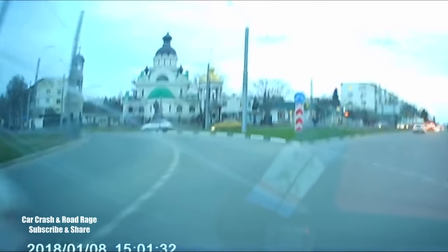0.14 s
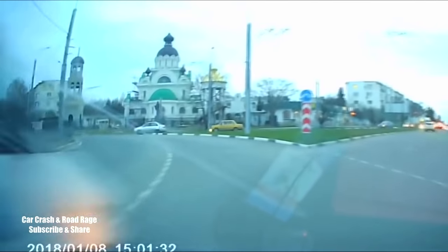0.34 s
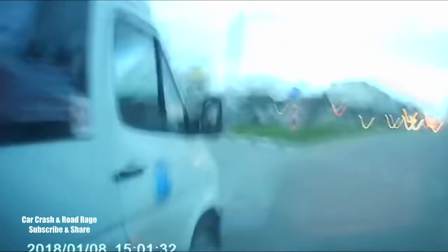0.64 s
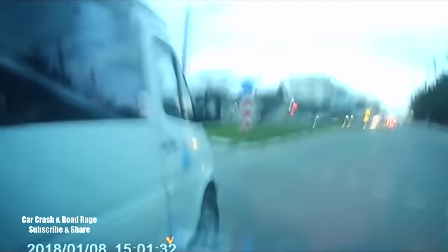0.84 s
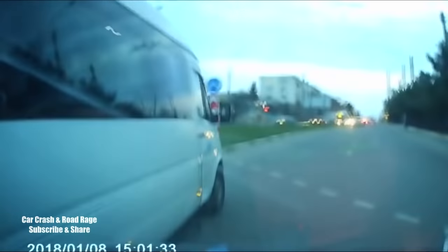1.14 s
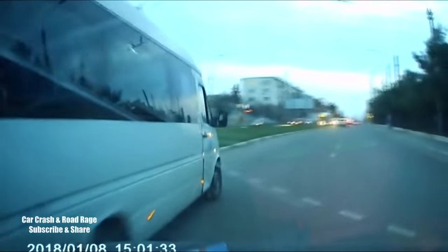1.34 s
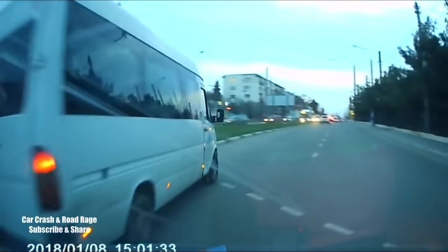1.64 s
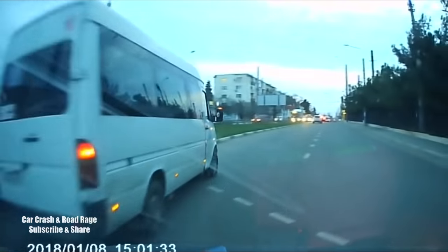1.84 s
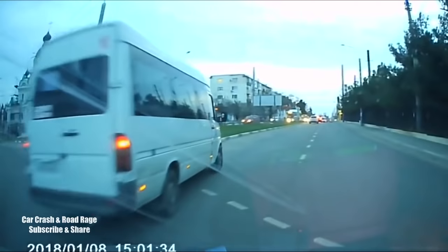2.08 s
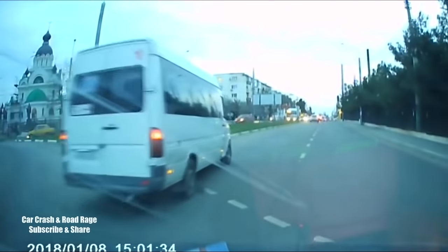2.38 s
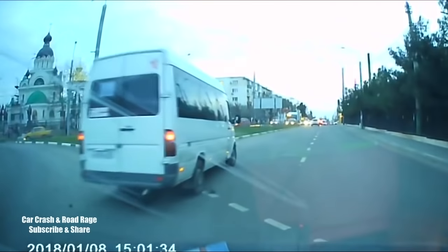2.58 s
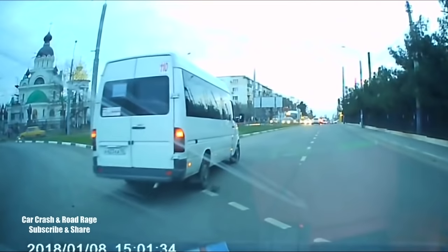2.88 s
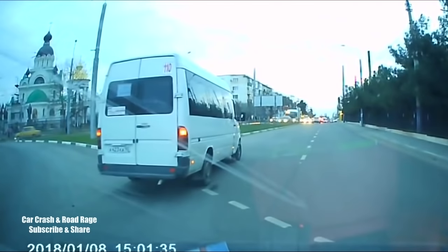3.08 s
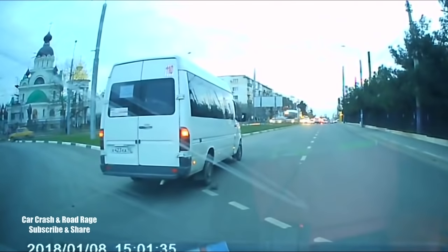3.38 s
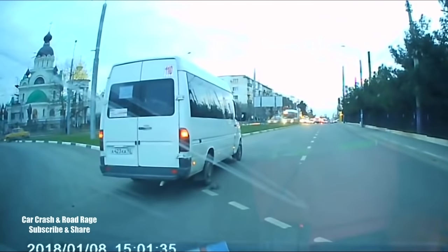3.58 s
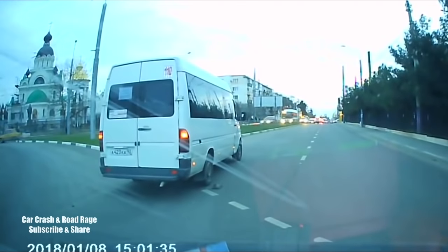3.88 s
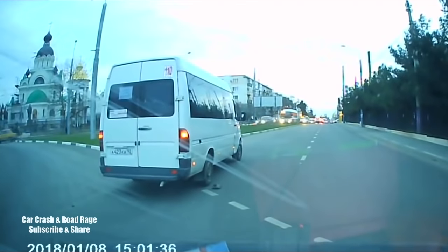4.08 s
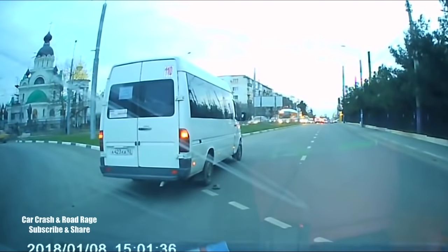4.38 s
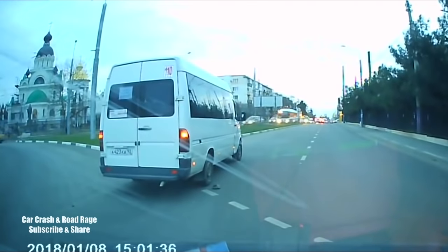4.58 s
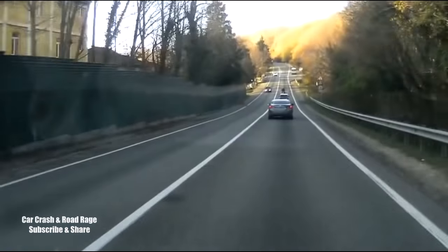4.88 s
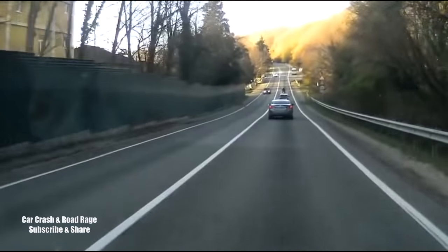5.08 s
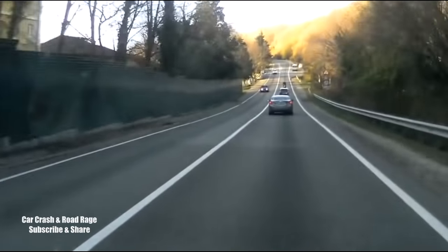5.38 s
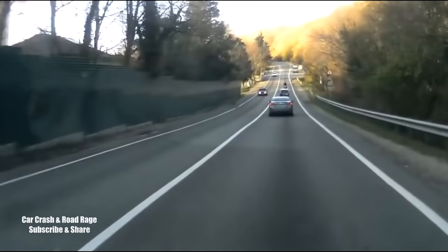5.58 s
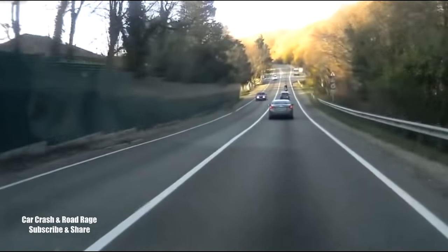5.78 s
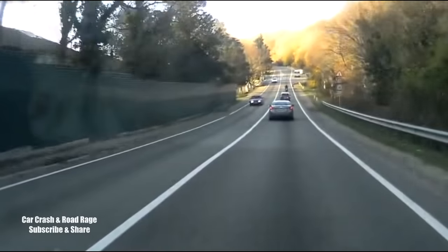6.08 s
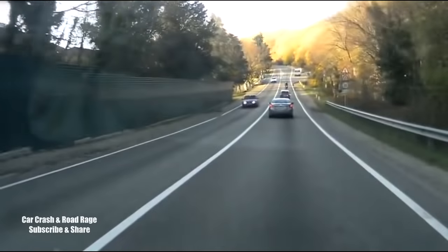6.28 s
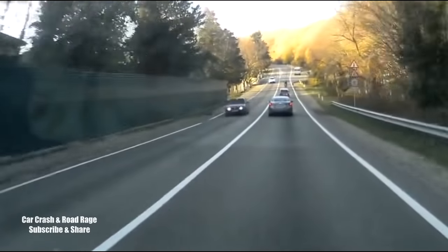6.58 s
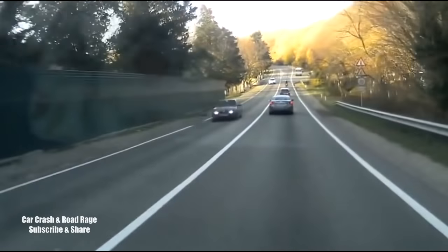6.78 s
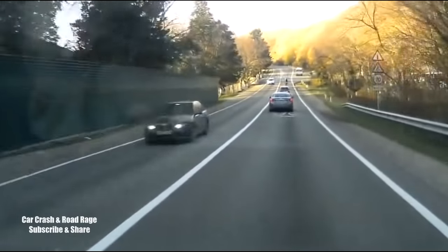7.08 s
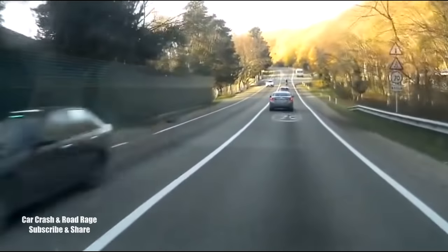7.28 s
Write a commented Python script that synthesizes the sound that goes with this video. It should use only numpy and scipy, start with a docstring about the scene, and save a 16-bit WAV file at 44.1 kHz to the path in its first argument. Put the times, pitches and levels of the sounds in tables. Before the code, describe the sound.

Inside a braking car, low road rumble is broken by a crunching side impact, loose bits clatter, engine idles, then a cut to fast buzzing highway driving.

```python
"""A crash heard inside a car braking on a roundabout: a van strikes its side and sheet metal crunches, as noise
grains under a level curve, sharp blows and two dull knocks. The body sways, as a low swing that overloads the
microphone; loose things fall, as noise bursts that ring resonances. Boom and roar, both shaped noise, give way to
an idling engine. Then a cut to another car at speed on a country road: noise boom, trim slapping on ringing modes,
and a recorder that crackles in flat jumps."""
import sys
import numpy as np
from scipy import signal
from scipy.fft import rfft, irfft, next_fast_len
from scipy.io import wavfile
from scipy.ndimage import uniform_filter1d

SR = 44100
rng = np.random.default_rng(int(sys.argv[2]) if len(sys.argv) > 2 else 0)


def to_wav(s):
    """Save 16-bit WAV."""
    ch = np.atleast_2d(s).T  # columns
    pcm = np.round(np.clip(ch, -1, 1) * 32767)  # PCM
    wavfile.write(sys.argv[1], SR, pcm.astype(np.int16))


N = 328104
T = np.arange(N) / SR   # seconds

# Spectra only set the colour of a layer; its loudness comes from a level curve.

# First car rolling to a stop. Each row: time in seconds, body boom in dB, tyre roar in dB.
ROLLING = [(0, -16.5, -36.5), (.4, -22.5, -37.5), (.7, -20, -41), (1.0, -26, -41.5), (1.3, -19, -46),
           (1.55, -21, -43.5), (1.75, -20, -72), (2.1, -44, -74)]
# Colour of the body boom. Each row: frequency in Hz, relative density in dB per Hz.
BOOM_COLOUR = [(5, -25), (10, -2), (16, 1.5), (24, 1.5), (40, -11), (52, -16.5), (70, -28.5), (110, -41.5),
               (400, -130)]
# Colour of the tyre roar. Each row: frequency in Hz, relative density in dB per Hz.
ROAR_COLOUR = [(41, -50), (70, 6.5), (92, -5.5), (265, -11.5), (593, -14.5), (1330, -12), (2550, -28.5),
               (2900, -33), (9900, -49), (11000, -61), (14300, -100), (22000, -120)]
TREBLE_HZ, TREBLE_FOLLOWS = 3500, 0.63   # roar treble fades faster: extra dB per dB
# Standing with the engine at idle. Each row: time in seconds, rumble in dB, street noise in dB.
STANDING = [(1.9, -32, -57.5), (2.38, -36.5, -61), (2.84, -36, -59.5), (3.58, -40, -63),
            (4.76, -35.5, -63.5)]
# Engine orders at idle. Each row: mean frequency in Hz, mean peak level in dB.
IDLE_ORDERS = [(23.4, -37), (46.8, -43)]
# Colour of the idle rumble. Each row: frequency in Hz, relative density in dB per Hz.
RUMBLE_COLOUR = [(5, -2), (12, 3), (20, -3.5), (35, -1.5), (60, -14.5), (90, -18.5), (160, -26), (260, -38),
                 (900, -130)]
# Colour of the street noise. Each row: frequency in Hz, relative density in dB per Hz.
STREET_COLOUR = [(120, -46), (220, 2), (500, 0), (900, -5), (1550, -7), (1900, -15.5), (3500, -23.5),
                 (7000, -39)]
STOP_S, STOP_FADE_S = 1.61, 0.27

# Colour of the electronic hiss. Each row: frequency in Hz, relative density in dB per Hz.
HISS_COLOUR = [(1200, -32), (3000, -9), (6000, -8.5), (10400, -9), (11300, -24), (15000, -27)]
HISS_DB, WHINE_HZ, WHINE_DB = -79.5, 10094, -89   # both levels in dB rms
# Cabin and housing resonances of the first car. Each row: frequency in Hz, width in Hz, boost in dB.
CABIN_MODES = [(1350, 74, 2), (2360, 180, 4), (3656, 290, 3.5), (4700, 200, -1), (6210, 290, 0.5),
               (7630, 300, 2), (8300, 950, -8.5), (9400, 180, 3)]
FIRST_TOP_HZ = 10550   # the first microphone hears little above this

# Second car at speed. Each row: time in seconds, body boom in dB, road noise in dB, before the resonant boosts.
CRUISE = [(4.8, -21.5, -38), (5.25, -20.5, -36.5), (5.55, -19, -37.5), (6.09, -23, -36.5),
          (6.63, -18.5, -36.5), (6.92, -21.5, -39), (7.3, -22.5, -35.5)]
# Colour of its body boom. Each row: frequency in Hz, relative density in dB per Hz.
CRUISE_BOOM_COLOUR = [(5, -63), (12, 8), (19, 6), (28, 8), (40, 2), (51, 3.5), (60, -5), (78, -39),
                      (300, -130)]
# Body mode that shakes the trim. Each row: frequency in Hz, width in Hz, boost in dB.
SHAKE_MODE = [(49.5, 6.6, 3.5)]
# Colour of its road noise. Each row: frequency in Hz, relative density in dB per Hz.
CRUISE_ROAD_COLOUR = [(40, -33), (70, -5), (144, -13.5), (300, -18), (480, -32), (810, -31), (1100, -41.5),
                      (1500, -41), (2000, -57), (3700, -59), (9000, -64.5), (15000, -69.5)]
# Cabin and tyre cavities. Each row: frequency in Hz, width in Hz, boost in dB.
CAVITY_MODES = [(102.9, 6.3, 13), (180.1, 8, 10), (271.5, 10.5, 6.5), (394.4, 23, 6)]
# Slaps of the buzzing trim. Each row: time in seconds (the strike lands a set delay later), strike level in dB.
SLAPS = [(4.8284, -52), (4.8564, -38), (4.8733, -32), (4.9197, -36), (4.9524, -43), (4.9876, -47),
         (5.0663, -46), (5.0848, -54), (5.1083, -48), (5.1272, -37), (5.1432, -38), (5.1586, -37),
         (5.215, -45), (5.2255, -40), (5.2442, -38), (5.2689, -37), (5.284, -37), (5.3467, -49),
         (5.3647, -44), (5.409, -54), (5.4259, -35.5), (5.445, -40), (5.5188, -32.5), (5.5364, -43),
         (5.5518, -42), (5.5687, -35), (5.5903, -36), (5.6077, -36), (5.6272, -34), (5.6528, -35.5),
         (5.6714, -43), (5.713, -30.5), (5.7316, -31), (5.7505, -35), (5.7658, -33.5), (5.8107, -50),
         (5.8341, -34.5), (5.8666, -39), (5.9614, -42.5), (6.0601, -41.5), (6.0856, -47), (6.0985, -44),
         (6.1449, -43), (6.1693, -30.5), (6.1875, -37.5), (6.2048, -36), (6.2218, -39), (6.34, -43),
         (6.3989, -47), (6.4234, -39), (6.4446, -38), (6.4574, -38), (6.4772, -34), (6.49, -42),
         (6.509, -49), (6.5271, -30), (6.568, -37), (6.5849, -33), (6.5964, -43), (6.6099, -30.5),
         (6.631, -31.5), (6.7092, -40.5), (6.7393, -36), (6.8189, -42), (6.8448, -44), (6.9157, -34.5),
         (6.9772, -39), (6.995, -33), (7.0713, -39.5), (7.1102, -44), (7.1557, -43), (7.2195, -46),
         (7.2379, -38), (7.2908, -33), (7.3058, -32), (7.3277, -29), (7.3432, -31), (7.36, -30),
         (7.3936, -27.5), (7.4121, -30)]
# What the slapping trim rings with. Each row: frequency in Hz, level in dB, 60 dB decay in seconds.
SLAP_MODES = [(1544, -18, 0.0053), (2214, -9.5, 0.0021), (2582, -0.5, 0.0062), (3060, -1.5, 0.0076),
              (5100, -19, 0.0034)]
SLAP_LAG_S, SLAP_SPREAD_DB = .0008, 2   # delay from each row's time to its strike; uneven stirring of the modes
BUZZ_TOP_HZ = 3350   # all modes but the highest end sharply above this
CHATTER_DB, TREMBLE_DB = -24, -66
# Crackles of the recorder. Each row: start in seconds, height of the first jump in dB.
CRACKLES = [(4.873, -30.5), (4.9784, -38), (5.1458, -33.5), (5.2439, -29.5), (5.44, -33), (5.454, -37),
            (5.5185, -28.5), (5.533, -33), (5.581, -35.5), (5.659, -30), (5.69, -36.5), (5.8474, -34),
            (6.007, -32), (6.259, -44), (6.285, -39), (6.583, -35), (6.629, -29.5), (6.645, -33),
            (6.673, -39), (6.7412, -33), (6.824, -35.5), (6.8284, -32.5), (7.2599, -30.5), (7.406, -27.5)]
CRACKLE_S, CRACKLE_TOP_HZ = .0005, 6000   # length of a flat jump; rounding of its edges
FAINT_PER_S, FAINT_DB = 14, -48   # random weaker crackles, with the level of the faintest
# A hard tick once a second. Each row: start in seconds, height in dB.
HARD_TICKS = [(4.9387, -20), (5.9389, -26.5), (6.9385, -17)]
HARD_TICK_S = 1 / 8000

# Dull knocks: those at 0.998 s and 1.051 s are the crash's own crunch, the rest loose things. Each row: start in
# seconds, level in dB, scuff centre in Hz, decay constant in seconds (never under 0.002).
KNOCKS = [(0.998, -40, 1580, 0.015), (1.051, -21.5, 2150, 0.011), (1.42, -34, 1080, 0.011),
          (1.474, -32, 650, 0.0056), (1.487, -31.5, 1340, 0.005), (1.587, -37, 1290, 0.005),
          (1.5945, -25, 940, 0.0078), (1.612, -44, 1170, 0.0049), (1.70, -51.5, 550, 0.015),
          (1.733, -60, 2500, 0.0026), (1.86, -53.5, 1000, 0.011), (2.047, -56, 805, 0.013),
          (2.141, -51, 695, 0.0097), (2.25, -62, 1200, 0.0097), (2.344, -52, 1100, 0.019),
          (2.385, -61, 900, 0.014), (2.536, -55, 437, 0.0066), (2.686, -55, 900, 0.0083),
          (2.808, -49.5, 1300, 0.0038), (2.897, -52, 1200, 0.012), (2.946, -50, 990, 0.0048),
          (3.027, -45, 1400, 0.0071), (3.34, -62.5, 503, 0.011), (3.621, -59.5, 610, 0.014)]
# Dashboard trim. Each row: frequency in Hz, mean relative level in dB, 60 dB decay in seconds.
TRIM_MODES = [(344, -1.5, 0.09), (486, -7, 0.083), (683, -4.5, 0.049), (810, -3.5, 0.019),
              (1010, -2, 0.028), (1308, -1.5, 0.055), (1550, 0.5, 0.022), (2235, -9.5, 0.019)]
KNOCK_RISE_S, TRIM_RING_DB = 0.002, -27.5
# Small hard bits clattering. Each row: start in seconds, level in dB (peak is 6 dB higher),
# favoured pitch in Hz, decay constant in seconds.
CLATTERS = [(0.3454, -50, 3600, 0.0036), (0.5212, -48.5, 4750, .004), (0.7567, -48, 3660, 0.0041),
            (0.8689, -54, 7300, 0.004), (0.9582, -57, 6200, 0.0028), (1.031, -37, 6200, 0.0039),
            (1.052, -36, 5100, 0.0049), (1.303, -34, 3930, 0.0041), (1.33, -44, 3600, 0.0028),
            (1.365, -50, 3500, .005), (1.375, -43.5, 2900, 0.0034), (1.388, -52, 3500, 0.0037),
            (1.408, -50, 3900, 0.0043), (1.5369, -57, 3960, 0.0018), (1.592, -57, 4000, .005),
            (1.608, -49, 4500, 0.009), (1.635, -57, 4000, .005), (1.765, -57, 4770, 0.027),
            (1.79, -57, 4250, 0.022), (1.8094, -67, 5300, .008), (1.9814, -60, 3510, .004),
            (1.992, -56.5, 4470, 0.0066), (2.0308, -60, 6500, .008), (2.0887, -54, 5900, 0.011),
            (2.14, -62, 3500, 0.009), (2.1675, -52, 4170, 0.002), (2.204, -54.5, 4270, 0.0017),
            (2.275, -59.5, 4260, 0.0065), (2.342, -63, 3500, 0.0054), (2.384, -63, 4700, 0.013),
            (2.4234, -64, 3730, .012), (2.785, -65, 3400, .004), (2.808, -58, 3300, .002),
            (2.855, -66, 3500, .01), (3.1697, -61.5, 5400, 0.0069), (3.5603, -63, 3490, 0.0054)]
# What the bits ring with. Each row: nominal frequency in Hz, relative level in dB, 60 dB decay in seconds.
BIT_MODES = [(2600, -8, .006), (3050, -5, .005), (3500, -2, .007), (4000, -5, .008), (4800, -5, .009),
             (6200, 0, .012), (7700, -9, .006)]
TICK_RISE_S, BIT_DRY_DB = .0004, -9   # rise of a rattle; relative level of its dry click
FAVOUR_DB_PER_OCTAVE, BIT_SPREAD_DB, BIT_DETUNE = 16, 3.0, .03   # uneven stirring; bits differ a little in size
# Fainter bits settling at random after the crash.
BITS_FROM_S, BITS_LAST_S, BITS_DB, BITS_LOSS_DB_PER_S = 1.3, 2.2, -59.5, 3.5

# Metal grinding on metal. Each row: time in seconds, level in dB, gain of the treble in dB.
CRUNCH = [(0.985, -47, -30), (1.026, -26.5, -18), (1.046, -21, -0.5), (1.14, -19.5, -6.5), (1.24, -24.5, 1),
          (1.265, -27, 10), (1.32, -29.5, -2.5), (1.47, -41, 0.5), (1.64, -38.5, -9), (1.91, -46.5, -6)]
# Colour of the tearing metal. Each row: frequency in Hz, relative density in dB per Hz.
CRUNCH_COLOUR = [(40, -10), (70, -4), (130, -7.5), (250, -15), (470, -24.5), (1200, -29.5), (2200, -40),
                 (3900, -44.5), (5500, -52), (10000, -54.5), (15000, -89.5)]
CRUNCH_FADE_S = 0.024
BUCKLE_DB, BUCKLE_PER_S = 4.0, 55   # random swing of each band, and how often
# Blows on the panels. Each row: start in seconds, level in dB, decay constant in seconds (never under 0.002).
BLOWS = [(1.001, -25, 0.018), (1.035, -20, 0.0099), (1.046, -16, 0.0055), (1.051, -17, 0.0074),
         (1.071, -21.5, 0.027), (1.105, -16, 0.0061), (1.132, -19, 0.009), (1.146, -29, 0.0033),
         (1.175, -34, 0.0043), (1.188, -27, 0.0085), (1.218, -18.5, 0.0065), (1.244, -20, 0.0086),
         (1.257, -22, 0.0035), (1.262, -9.5, 0.0025), (1.305, -23, 0.0058), (1.31, -27, 0.0072),
         (1.351, -34, 0.014), (1.383, -33, 0.012), (1.403, -29, 0.008)]
BLOW_RISE_S, BLOW_LOW_HZ = 0.00079, 183   # blows carry less bass than the grinding
# Door and wing panels. Each row: frequency in Hz, relative level in dB, 60 dB decay in seconds.
PANEL_MODES = [(523, -20, 0.0686), (554.5, -3, 0.24), (697, -7, 0.12), (950, 0, 0.03), (1430, -6.5, 0.42),
               (1930, 1, 0.047), (2420, -7, 0.028), (3560, -26, 0.096)]
PANEL_RING_DB = -48   # share of the metal noise that sets the panels ringing
# The body rocking on its springs: rise, hold, then a steady dying away.
SWAY_HZ, SWAY_START_S, SWAY_LEAN = 14.1, 1.048, .05   # it goes further to one side
SWAY_DB, SWAY_FROM_S, SWAY_RISE_S, SWAY_HOLD_S, SWAY_LOSS_DB_PER_S = -4, 1.05, 0.09, 0.125, 400

CUT_S, FADE_S = 4.778, 0.026
OVERLOAD, CUTOFF_HZ = .5, 16100


def amp(db):
    """dB to gain."""
    return 10 ** (np.asarray(db) / 20)


def rms_one(x):
    """Scale to rms 1."""
    return x / np.sqrt(np.mean(x ** 2) + 1e-20)


def in_time(rows):
    """Columns of a curve, sample by sample."""
    seconds, *columns = np.transpose(rows)
    return [np.interp(T, seconds, column) for column in columns]


def white():
    """White noise."""
    return rng.standard_normal(N)


def coloured(x, spectrum):
    """Give x the colour of a spectrum, drawn over log frequency; rms 1."""
    size = next_fast_len(N)
    hz, db = np.transpose(spectrum)
    grid = np.maximum(np.arange(size // 2 + 1) * SR / size, 1)
    gain = amp(np.interp(np.log(grid), np.log(hz), db))
    return rms_one(irfft(rfft(x, size) * gain, size)[:N])


def drift(rate):
    """Random wander through rate normal draws a second, joined by straight lines."""
    count = int(N / SR * rate) + 2
    return np.interp(T * rate, np.arange(count), rng.standard_normal(count))


def boosted(x, peaks):
    """A chain of resonant peaks, or dips where the boost is negative."""
    for hz, width, db in peaks:
        w, g = 2 * np.pi * hz / SR, np.sqrt(amp(db))
        a = np.sin(w) * width / hz / 2
        middle = -2 * np.cos(w)
        x = signal.lfilter([1 + a * g, middle, 1 - a * g], [1 + a / g, middle, 1 - a / g], x)
    return x


def ring(clicks, hz, t60):
    """A damped resonance: a unit click starts a sine of height 1, 60 dB down after t60 seconds."""
    r, w = amp(-60 / (t60 * SR)), 2 * np.pi * hz / SR
    return signal.lfilter([0, np.sin(w)], [1, -2 * r * np.cos(w), r * r], clicks + 1e-18)


def clicks_at(seconds, gain):
    """A click train."""
    out = np.zeros(N)
    np.add.at(out, np.round(np.asarray(seconds) * SR).astype(int), gain)
    return out


def held(clicks, seconds):
    """Stretch each click into a flat jump."""
    return np.convolve(clicks, np.ones(round(seconds * SR)))[:N]


def grains(per_s, spread_db):
    """Random clicks of very uneven size and either sign."""
    size = amp(spread_db * np.minimum(rng.exponential(1, N), 5))
    return (rng.random(N) < per_s / SR) * size * rng.choice([-1, 1], N)


def dying(clicks, length):
    """Each click opens an envelope with a rise of about a millisecond and decay constant length."""
    r = np.exp(-1 / (length * SR))
    return uniform_filter1d(signal.lfilter([1], [1, -r], clicks), size=41, origin=20)


def electronics():
    """Steady coloured hiss and a thin sine whine."""
    whine = np.sqrt(2) * np.sin(2 * np.pi * WHINE_HZ * T)
    return amp(HISS_DB) * coloured(white(), HISS_COLOUR) + amp(WHINE_DB) * whine


def standing():
    """Idle: low engine orders share one hunting speed, over noise rumble and street noise."""
    rumble_db, street_db = in_time(STANDING)
    turned = np.cumsum(1 + 0.0223 * drift(1.5)) / SR   # idle speed hunts a little
    orders = sum(amp(db + 2.7 * drift(2.58)) * np.sin(2 * np.pi * hz * turned) for hz, db in IDLE_ORDERS)
    rumble = amp(rumble_db) * coloured(white(), RUMBLE_COLOUR)
    street = amp(street_db) * coloured(white(), STREET_COLOUR)
    return orders + rumble + street


def rolling():
    """Body boom and tyre roar: two noises, the roar losing treble faster as it fades."""
    boom_db, roar_db = in_time(ROLLING)
    boom = amp(boom_db) * coloured(white(), BOOM_COLOUR)
    roar = amp(roar_db + 1.5 * drift(5.3)) * coloured(white(), ROAR_COLOUR)
    top = signal.lfilter(*signal.butter(2, TREBLE_HZ, "high", fs=SR), roar)
    roar = roar + top * (amp(TREBLE_FOLLOWS * (roar_db - roar_db[0])) - 1)
    return boom + roar


def stopping():
    """Equal-power fade from the rolling car to the standing one."""
    stopped = np.clip((T - STOP_S) / STOP_FADE_S, 0, 1)
    return np.sqrt(1 - stopped) * rolling() + np.sqrt(stopped) * standing()


def cruising():
    """Second car's boom and road noise, coloured by body and cavity resonances."""
    boom_db, road_db = in_time(CRUISE)
    boom = amp(boom_db) * boosted(coloured(white(), CRUISE_BOOM_COLOUR), SHAKE_MODE)
    road = amp(road_db) * boosted(coloured(white(), CRUISE_ROAD_COLOUR), CAVITY_MODES)
    return boom + road


def recorder_crackle():
    """Each crackle is three shrinking flat jumps of alternating sign; fainter single jumps come at random."""
    s, db = np.transpose(CRACKLES)
    chance = rng.random((len(s), 4))
    sign = np.sign(chance[:, 0] - .5)
    steps = amp(FAINT_DB) * grains(FAINT_PER_S, 2.4)
    for k in range(3):
        lag = 0.0013 * k * (0.45 + .6 * chance[:, k + 1])
        steps = steps + clicks_at(s + lag, sign * (-1) ** k * amp(db - 1.7 * k))
    return signal.lfilter(*signal.butter(1, CRACKLE_TOP_HZ, fs=SR), held(steps, CRACKLE_S))


def hard_ticks():
    """A brief flat pulse once a second."""
    s, db = np.transpose(HARD_TICKS)
    return held(clicks_at(s, amp(db)), HARD_TICK_S)


def slapping_trim():
    """Each slap strikes the trim's modes its own way and chatters on; small slaps come at random."""
    s, db = np.transpose(SLAPS)
    struck = s + SLAP_LAG_S
    trembling = amp(TREMBLE_DB + 4.5 * drift(9)) * grains(400, 3.3)
    chatter = amp(CHATTER_DB) * dying(clicks_at(struck, amp(db)), 0.014) * grains(2500, 2.0) + trembling
    spread = SLAP_SPREAD_DB * rng.standard_normal((len(s), len(SLAP_MODES)))
    rings = []
    for (hz, level_db, t60), own_db in zip(SLAP_MODES, spread.T):
        strikes = clicks_at(struck, amp(db + own_db)) + chatter
        rings.append(amp(level_db) * ring(strikes, hz, t60))
    buzz_cut = signal.cheby2(6, 24, BUZZ_TOP_HZ, fs=SR, output="sos")
    return signal.sosfilt(buzz_cut, sum(rings[:-1])) + rings[-1]


def second_car():
    """The other cabin: boom and road, buzzing trim, and the recorder's crackles and ticks."""
    return cruising() + slapping_trim() + recorder_crackle() + hard_ticks()


def bursts(rows, rise, below, above):
    """Short noise bursts, each in a broad band reaching octaves below and above its centre."""
    out, span = np.zeros(N), np.arange(int(.15 * SR)) / SR
    for (s, db, hz, length), noise in zip(rows, rng.standard_normal((len(rows), len(span)))):
        shape = (1 - np.exp(-span / rise)) * np.exp(-span / max(length, .002))
        band = signal.butter(2, [hz / 2 ** below, hz * 2 ** above], "band", fs=SR, output="sos")
        i = round(s * SR)
        out[i:i + len(span)] += amp(db) * shape * rms_one(signal.sosfilt(band, noise))
    return out


def knocks():
    """Noise scuffs, two from the crunch and the rest from loose things, drive the damped trim modes."""
    scuff = bursts(KNOCKS, KNOCK_RISE_S, below=1.0, above=1.1)
    trim = sum(amp(db + 2.5 * drift(12)) * ring(scuff, hz, t60) for hz, db, t60 in TRIM_MODES)
    return scuff + amp(TRIM_RING_DB) * trim


def clatter(rows):
    """Each row is a short rattle that stirs the modes near its favoured pitch most."""
    out, span = np.zeros(N), np.arange(int(.12 * SR)) / SR
    noises = rng.standard_normal((len(rows), len(span)))
    chances = rng.standard_normal((len(rows), len(BIT_MODES)))
    dry_band = signal.butter(1, [2000, 6500], "band", fs=SR)
    for (s, db, hz, length), noise, chance in zip(rows, noises, chances):
        rattle = noise * (1 - np.exp(-span / TICK_RISE_S)) * np.exp(-span / max(length, .001))
        sound = amp(BIT_DRY_DB) * 20 * signal.lfilter(*dry_band, rattle)
        for (mode_hz, mode_db, t60), c in zip(BIT_MODES, chance):
            away_db = FAVOUR_DB_PER_OCTAVE * abs(np.log2(mode_hz / hz))
            tuned_hz = mode_hz * (1 + BIT_DETUNE * chance[0])
            sound = sound + amp(mode_db + BIT_SPREAD_DB * c - away_db) * ring(rattle, tuned_hz, t60)
        i = round(s * SR)
        out[i:i + len(span)] += amp(db) * 2 * sound / np.abs(sound).max()
    return out


def settling_bits():
    """Forty random clatters, crowded early and fainter later."""
    late, soft, pitch, length = rng.random((40, 4)).T
    since = BITS_LAST_S * late ** 2
    level_db = BITS_DB - BITS_LOSS_DB_PER_S * since - 9 * soft
    return clatter(np.transpose([BITS_FROM_S + since, level_db, 2800 * 2 ** (1.3 * pitch), .002 + 0.018 * length]))


def knocks_and_clatter():
    """Dull knocks set the trim ringing; small hard bits clatter in the treble."""
    return knocks() + clatter(CLATTERS) + settling_bits()


def body_sway():
    """The body rocks on its springs: a low sine with a third harmonic, leaning to one side."""
    after = np.maximum(T - SWAY_FROM_S - SWAY_RISE_S - SWAY_HOLD_S, 0)
    rise = np.clip((T - SWAY_FROM_S) / SWAY_RISE_S, 0, 1)
    turn = 2 * np.pi * SWAY_HZ * (T - SWAY_START_S)
    swing = np.sin(turn - .3) + .2 * np.sin(3 * turn + .6)   # the bump stops square the swing off
    return amp(SWAY_DB - SWAY_LOSS_DB_PER_S * after) * rise * (swing + SWAY_LEAN)


def buckling(x):
    """Buckling metal shifts its resonances: third-octave bands swell and sink on their own."""
    edges = 400 * 2 ** np.arange(0, 4.7, 1 / 3)
    out = signal.sosfilt(signal.butter(2, edges[0], fs=SR, output="sos"), x)
    for k, (low, high) in enumerate(zip(edges, edges[1:])):
        band = signal.sosfilt(signal.butter(2, [low, high], "band", fs=SR, output="sos"), x)
        out = out - (-1) ** k * amp(BUCKLE_DB * drift(BUCKLE_PER_S)) * band   # neighbours alternate in sign
    return out


def tearing(treble_db):
    """Tearing sheet metal: clumps of grains and noise, buckling, with the treble in separate cracks."""
    clumps = (grains(4000, 2.85) + 0.65 * white()) * amp(2.2 * drift(150))
    tear = buckling(coloured(clumps, CRUNCH_COLOUR))
    body, top = (signal.lfilter(*signal.butter(3, 3300, kind, fs=SR), tear) for kind in ("low", "high"))
    return body + top * amp(treble_db + 2.5 * drift(120))


def blow_swells():
    """Level of the blows: each rises fast and dies away exponentially."""
    swells = 0
    for s, db, length in BLOWS:
        since = np.maximum(T - s, 0)
        swells = swells + amp(db) * (1 - np.exp(-since / BLOW_RISE_S)) * np.exp(-since / max(length, .002))
    return swells


def crash():
    """Tearing metal under the grinding curve and the blows sets the panels ringing, on the rocking body."""
    level_db, treble_db = in_time(CRUNCH)
    fade = np.clip(1 + (CRUNCH[-1][0] - T) / CRUNCH_FADE_S, 0, 1)
    grinding = amp(level_db) * (T > CRUNCH[0][0]) * fade
    tear = tearing(treble_db)
    lean_tear = signal.lfilter(*signal.butter(1, BLOW_LOW_HZ, "high", fs=SR), tear)
    metal = grinding * tear + blow_swells() * lean_tear
    panels = sum(amp(db) * ring(metal, hz, t60) for hz, db, t60 in PANEL_MODES)
    return metal + amp(PANEL_RING_DB) * panels + body_sway()


def scene():
    """The first car, then a short cross-fade to the second."""
    first = boosted(stopping() + knocks_and_clatter() + crash(), CABIN_MODES)
    first = signal.sosfilt(signal.butter(4, FIRST_TOP_HZ, fs=SR, output="sos"), first)
    first = first + electronics()
    fade = np.clip((T - CUT_S) / FADE_S, 0, 1) ** 2
    return ((1 - fade) * first + fade * second_car())[None]


def record(dry):
    """The converter clips flat; then a steep low-pass cuts the top."""
    clipped = np.clip(dry, -OVERLOAD, OVERLOAD)
    return signal.sosfilt(signal.cheby2(18, 60, CUTOFF_HZ, fs=SR, output="sos"), clipped)


dry = scene()
out = record(dry)
to_wav(out)
```